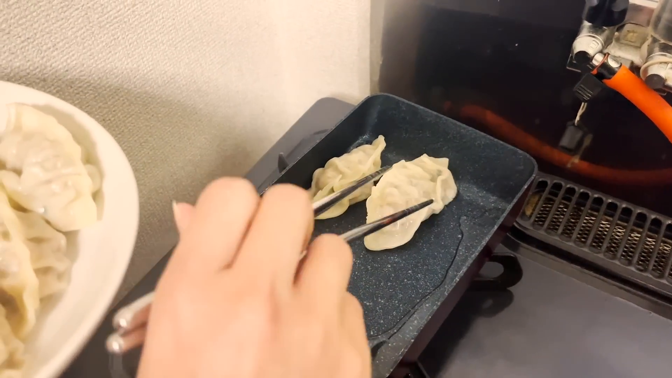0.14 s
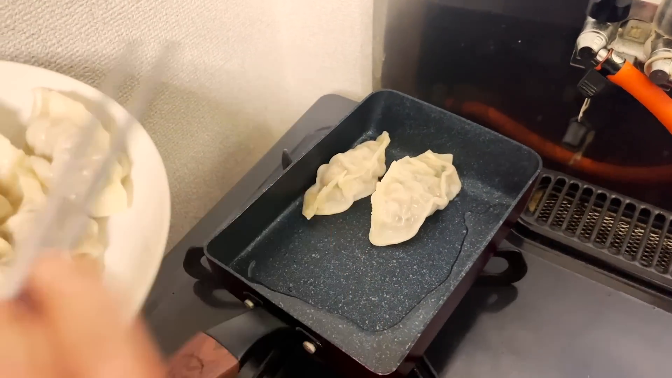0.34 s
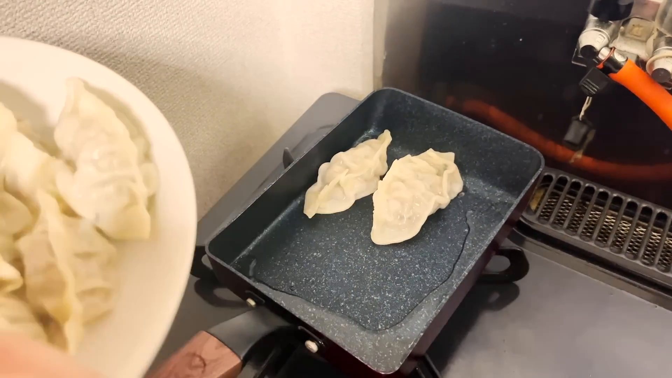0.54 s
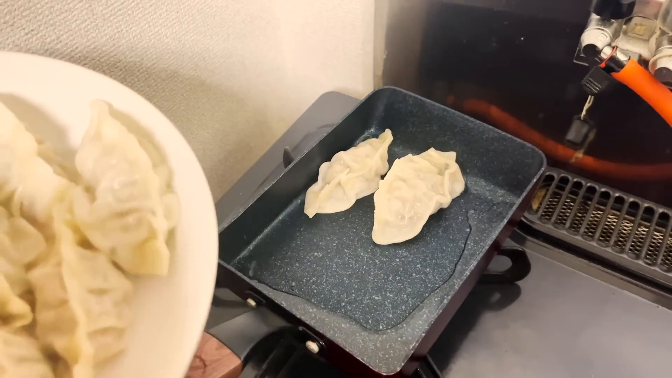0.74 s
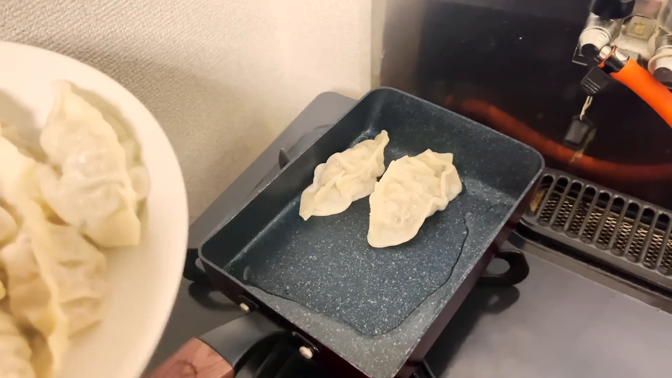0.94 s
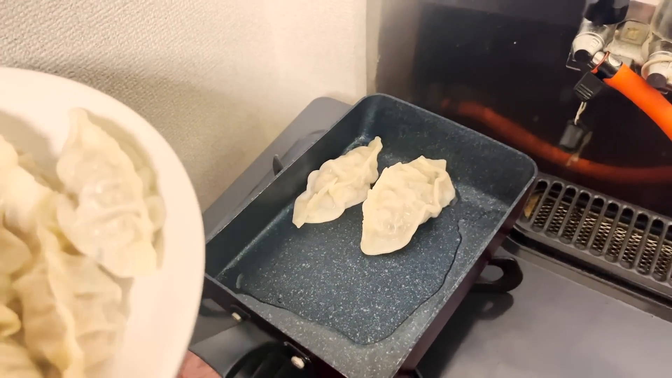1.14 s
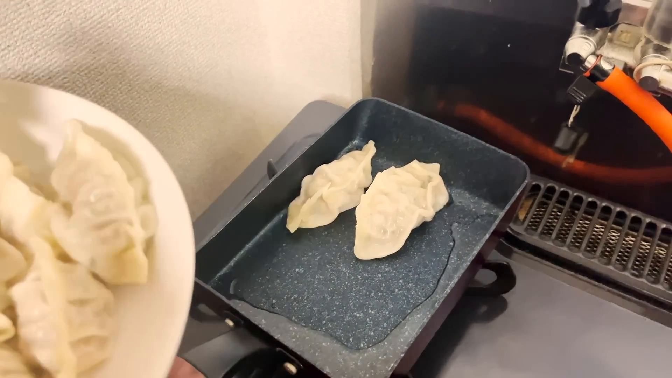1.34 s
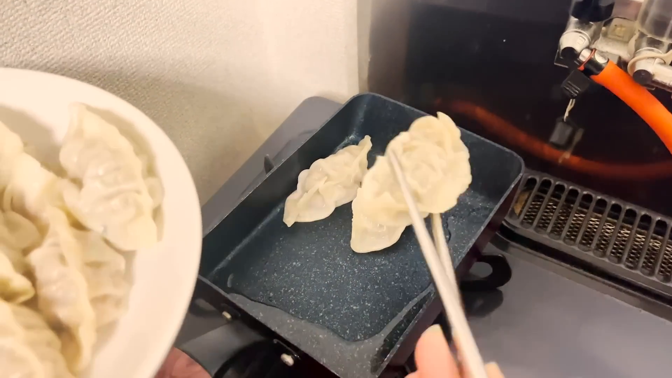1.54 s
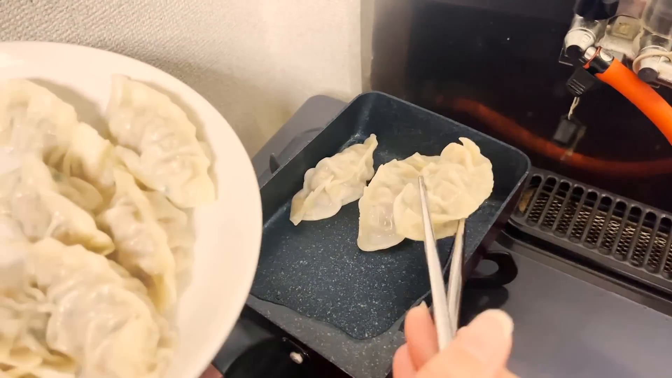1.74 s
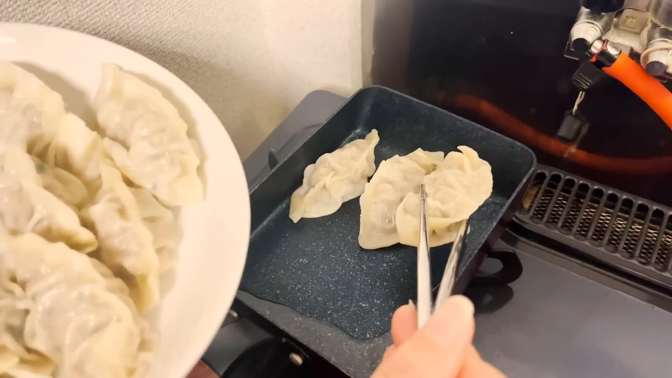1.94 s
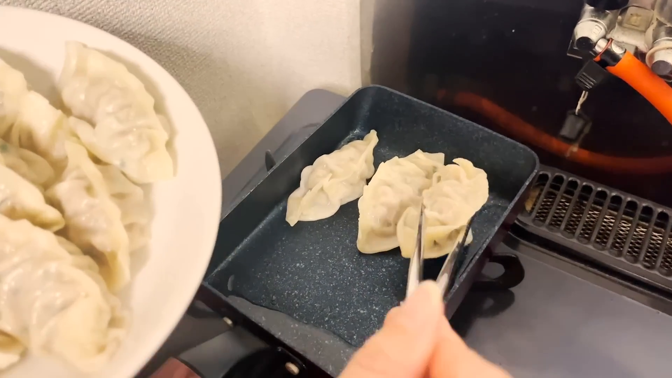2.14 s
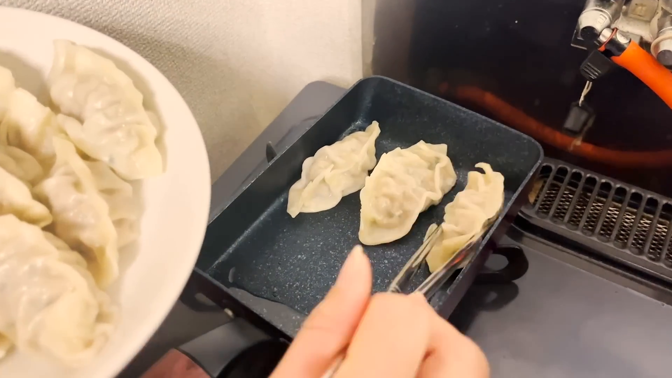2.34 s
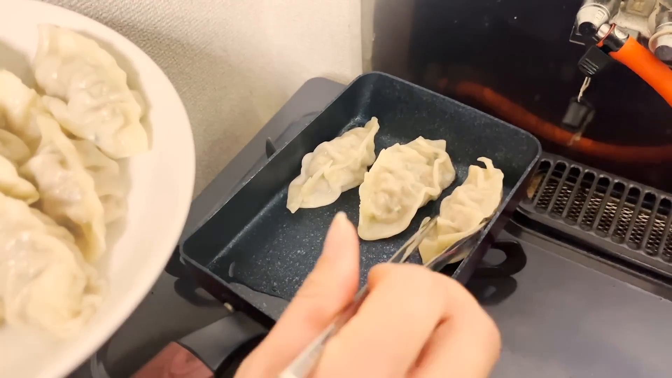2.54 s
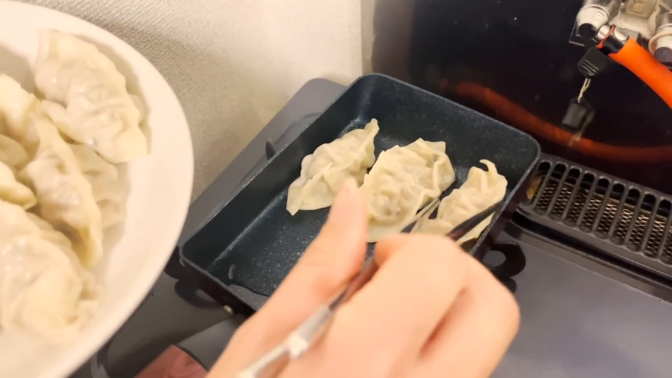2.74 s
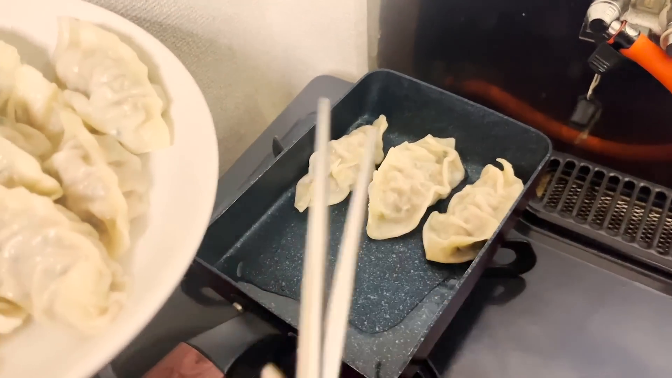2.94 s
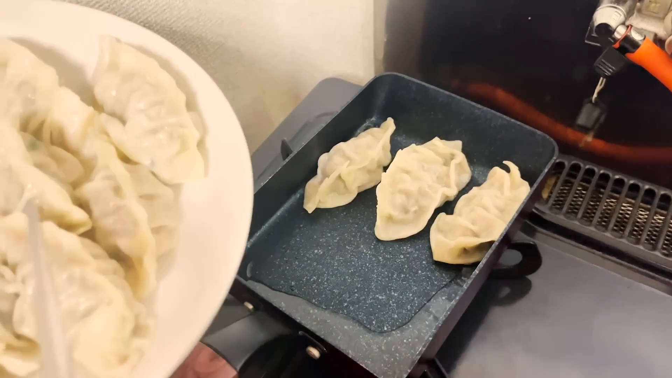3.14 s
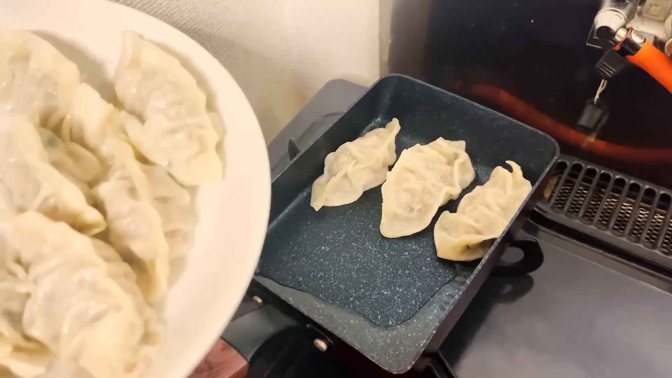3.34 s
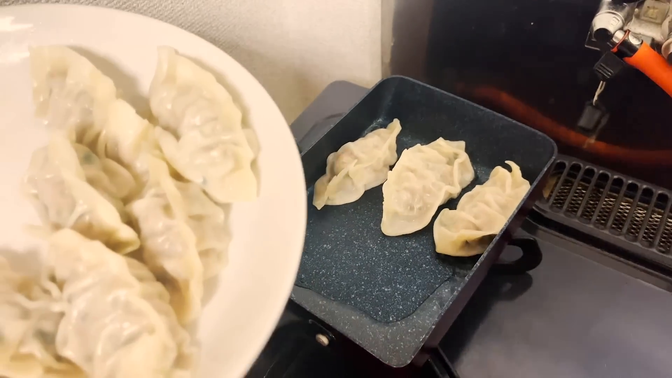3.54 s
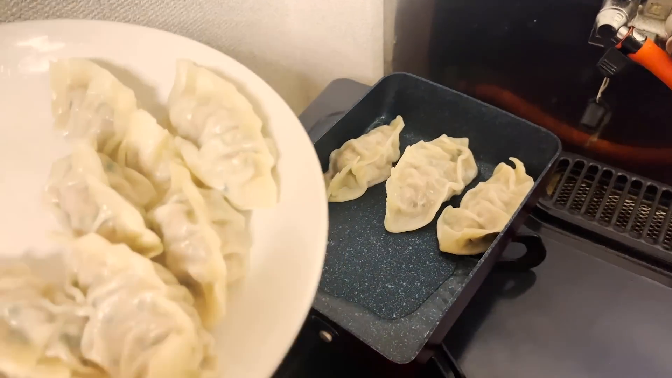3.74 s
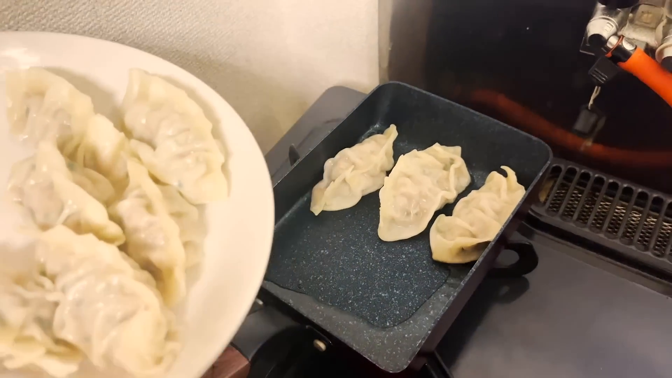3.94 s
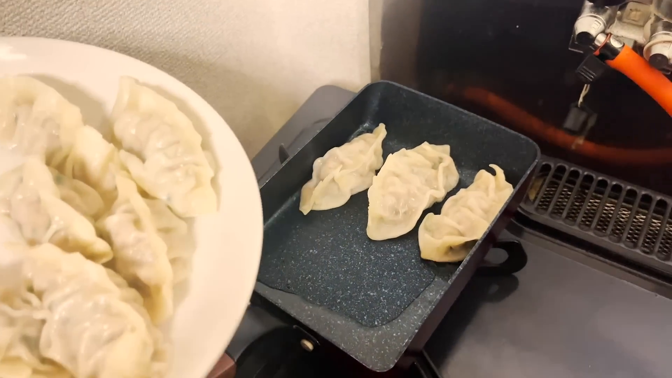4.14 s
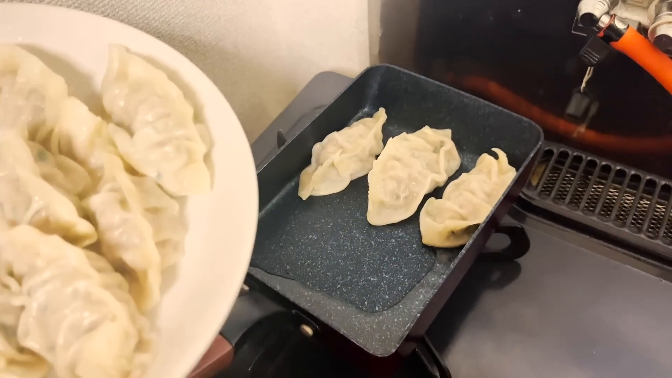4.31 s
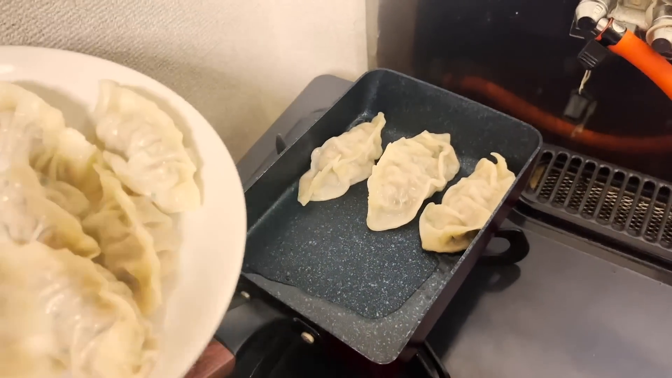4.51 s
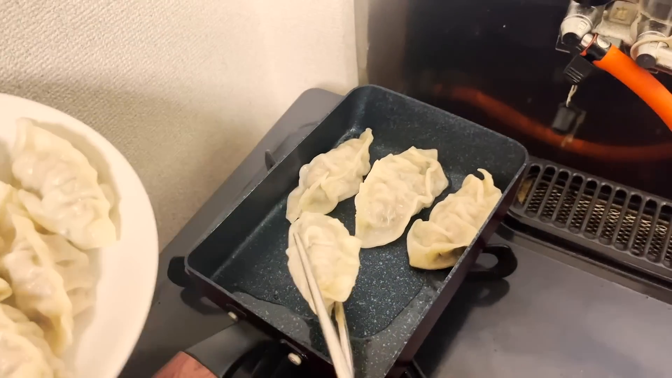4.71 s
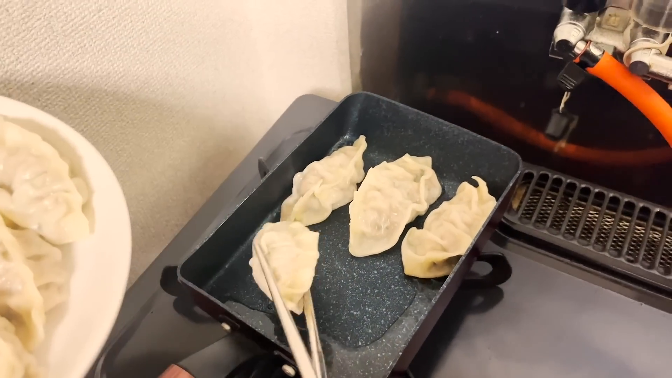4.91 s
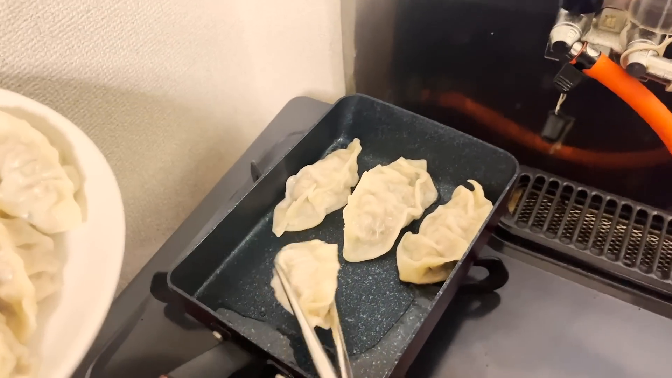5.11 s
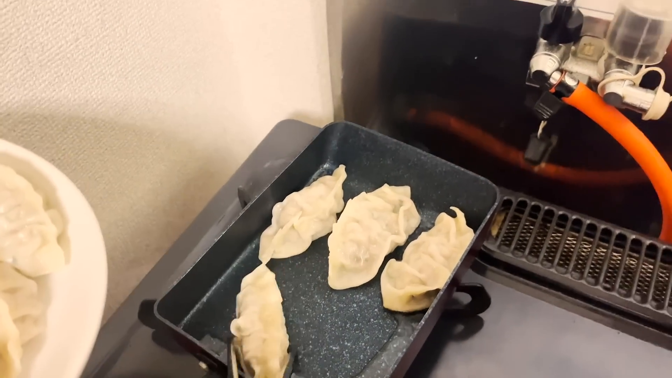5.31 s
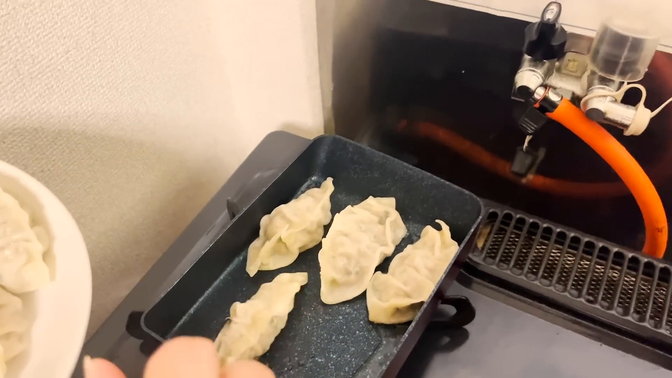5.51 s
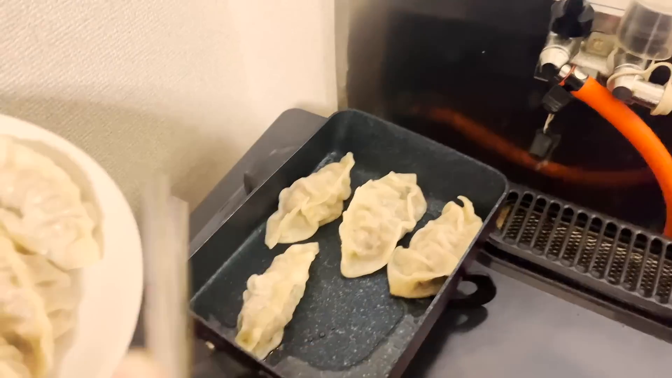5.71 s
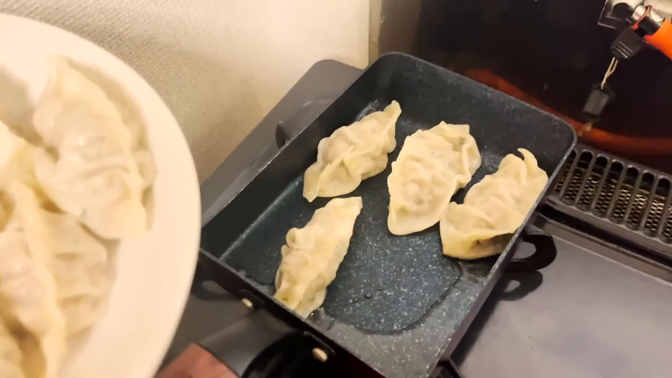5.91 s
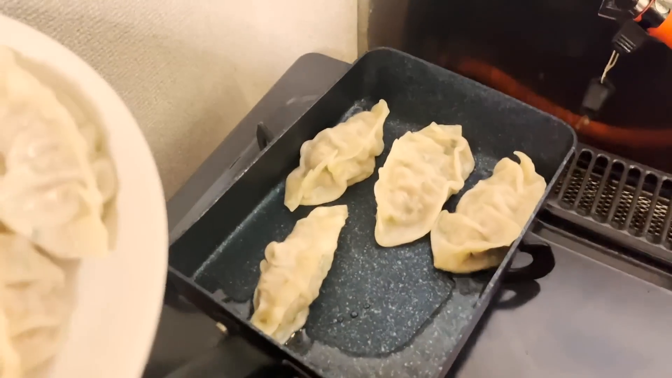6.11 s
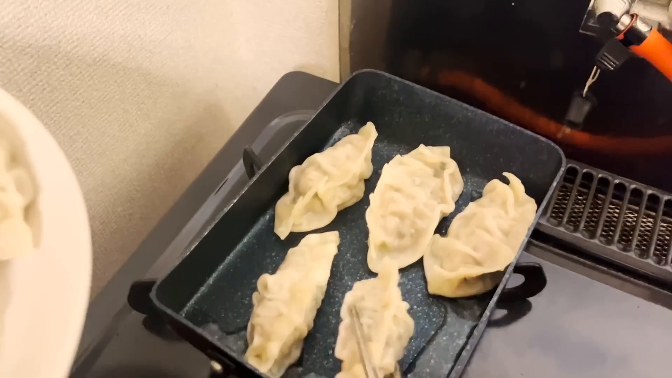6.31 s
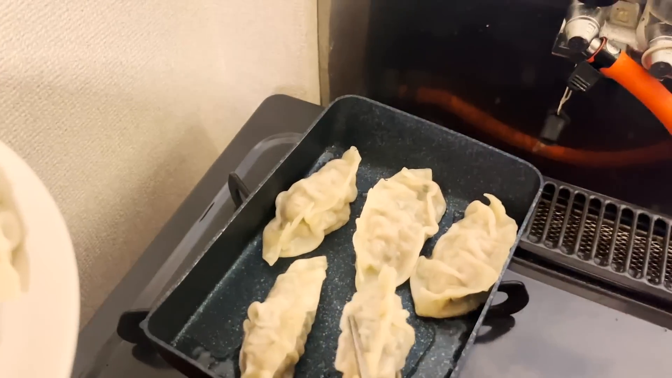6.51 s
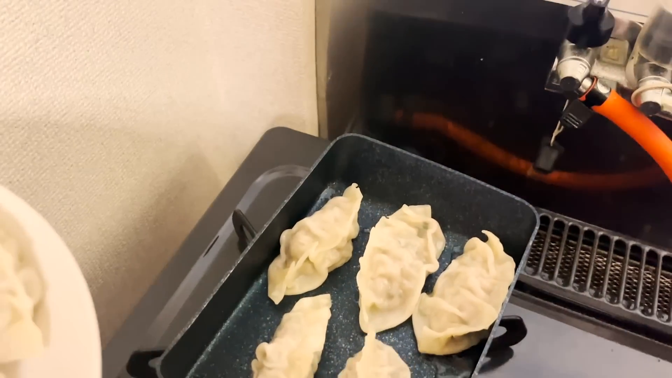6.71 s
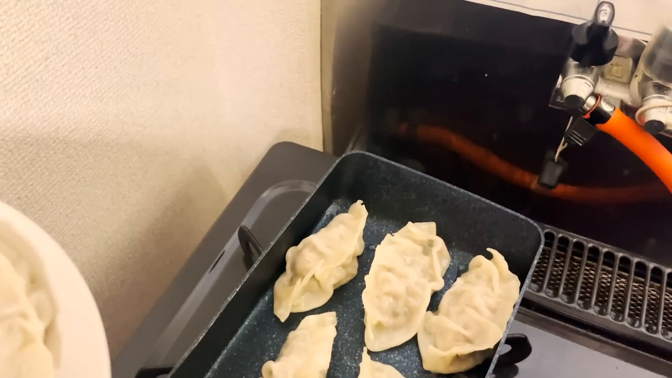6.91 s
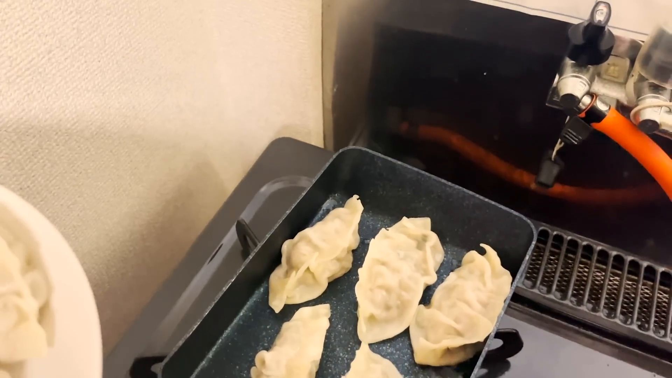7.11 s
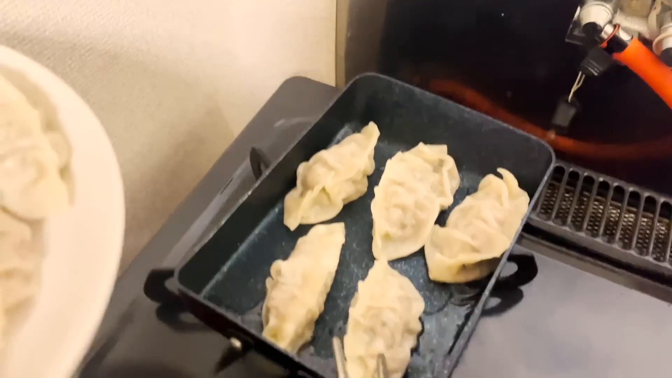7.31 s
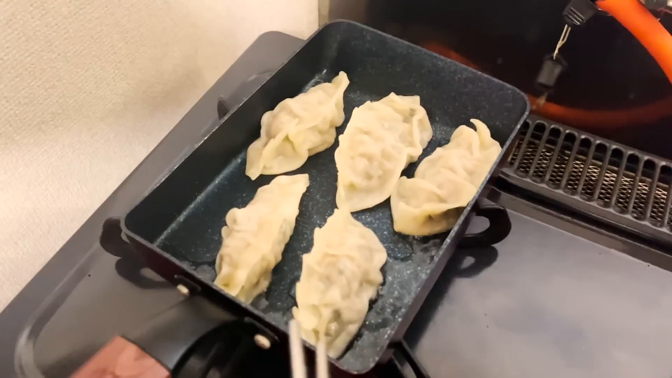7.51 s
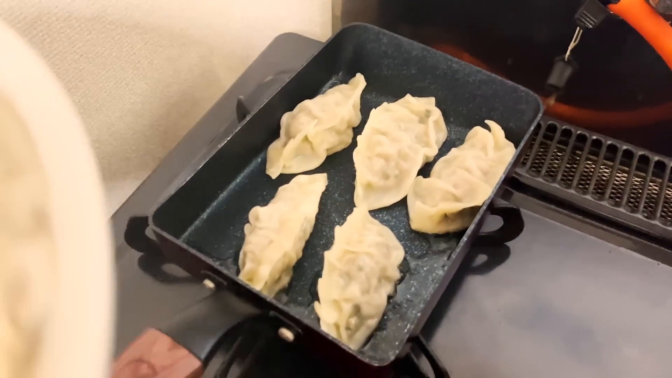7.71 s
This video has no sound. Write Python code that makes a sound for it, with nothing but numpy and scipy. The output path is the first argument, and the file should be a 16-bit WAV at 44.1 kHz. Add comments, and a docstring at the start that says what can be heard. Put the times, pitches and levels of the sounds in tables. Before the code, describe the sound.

Close crackling fry of dumplings in a home kitchen, dipping quieter midway then swelling again, with sharp oil pops, faint squeaks and a knock.

```python
"""Dumplings are set into a little hot oil in a small frying pan, in the corner of a home kitchen.
From the start random bubble bursts sizzle over a low rush of filtered noise, and drops spit in sharp cracks.
Metal chopsticks soon tick as decaying modes; low noise thuds at two landings, and a sinking drone comes and goes.
At a cut about 3 s in, a deep hum of narrow noise gives way to higher hums and the sizzle is quieter.
Then slipping chopsticks squeak as gliding tones, the sizzle swells again and a falling sine knocks once."""
import sys
import numpy as np
from scipy import signal
from scipy.fft import rfft, irfft, next_fast_len
from scipy.io import wavfile

SR = 44100
rng = np.random.default_rng(int(sys.argv[2]) if len(sys.argv) > 2 else 0)


def wrap_up_sound(samples):
    """Save the sound to the file named by the first command line argument, as 16-bit audio."""
    columns = np.atleast_2d(samples).T
    # keep every value between -1 and 1, then stretch to whole-number steps
    tamed = np.clip(columns, -1, 1)
    steps = np.round(tamed * 32767).astype(np.int16)
    wavfile.write(sys.argv[1], SR, steps)


N = 346273
TIME = np.arange(N) / SR
PRESSES_S, CUT_S, FILLS_S = 2.07, 3.11, 5.25   # centres of the changes in sizzle colour
ROOM_T60_S, CUTOFF_HZ = 0.17, 15900
# Signs of left and right.
SIDES = np.array([[1], [-1]])


def from_db(db):
    """Decibels to amplitude gain."""
    return 10 ** (np.asarray(db) / 20)


def rms_one(x):
    """Scale to an rms of 1."""
    return x / np.sqrt(np.mean(x ** 2) + 1e-20)


def at_hz(points, hz):
    """Interpolate a table over log frequency."""
    f, value = np.transpose(points)
    return np.interp(np.log(hz + 1), np.log(f), value)


def after(s, fade_s=0.042):
    """Linear rise from 0 to 1 centred on the given time."""
    return np.clip((TIME - s) / fade_s + .5, 0, 1)


def add(track, s, sound):
    """Mix a short sound into a track."""
    at = max(round(s * SR), 0)
    track[..., at:at + sound.shape[-1]] += sound[..., :N - at]


def drift(rate_hz, size=N):
    """Slow random curve from two-pole low-passed noise, scaled to an rms of 1."""
    r = np.exp(-40 * np.pi * rate_hz / SR)   # runs at SR / 20
    noise = rng.standard_normal(N // 20 + 4002)
    slow = signal.lfilter([1], [1, -2 * r, r * r], noise)[4000:]
    return np.interp(np.arange(size) / 20, np.arange(len(slow)), rms_one(slow))


def envelope(s, attack_s, hold_s, t60_s):
    """Linear attack, hold, then exponential release."""
    age = TIME - s
    release = np.clip(age - attack_s - hold_s, 0, 2 * t60_s)
    return np.clip(age / attack_s, 0, 1) * np.exp(-np.log(1000) * release / t60_s)


def colour(x, curve):
    """Causal (minimum-phase) filter whose gain in dB is curve(Hz)."""
    size = 8192
    cepstrum = irfft(np.log(from_db(curve(np.fft.rfftfreq(size, 1 / SR)))))
    cepstrum[1:size // 2] *= 2
    cepstrum[size // 2 + 1:] = 0
    response = irfft(np.exp(rfft(cepstrum)))
    response = response.reshape((1,) * (x.ndim - 1) + (-1,))
    return signal.fftconvolve(x, response, axes=-1)[..., :x.shape[-1]]


def cut(x, hz, kind, order=2):
    """Butterworth low- or high-pass."""
    return signal.sosfilt(signal.butter(order, min(hz, .45 * SR), kind, fs=SR, output="sos"), x)


def resonance(x, hz, width_hz):
    """One resonance with a gain of 1 at its peak."""
    r = np.exp(-np.pi * width_hz / SR)
    zeros = np.array([1, 0, -1]) * (1 - r * r) / 2
    return signal.lfilter(zeros, [1, -2 * r * np.cos(2 * np.pi * hz / SR), r * r], x)


def stereo_noise(size):
    """White noise, alike in both ears in the bass and largely unrelated in the treble."""
    # Each row: frequency in Hz, likeness of left and right from -1 to 1.
    likeness = [(70, .985), (140, .87), (300, .76), (1000, .5), (2500, .05), (5000, .05), (16000, .2)]
    mid, side = rfft(rng.standard_normal((2, size)))
    alike = np.clip(at_hz(likeness, np.fft.rfftfreq(size, 1 / SR)), -.99, .99)
    return irfft(np.sqrt((1 + alike) / 2) * mid + np.sqrt((1 - alike) / 2) * side * [[1], [-1]], size)


def path(tail_db=0.0, snap_db=-1.0, snap_t60_s=0.0045, pan_db=2.0, pan_t60_s=0.021,
         corner_db=-1.0, corner_t60_s=0.066, room_db=-7.5):
    """From pan to ears: direct snap, scatter in the pan, near walls, room; energy 1 per ear."""
    size = SR // 4
    t = np.arange(size) / SR
    out = np.zeros((2, size))
    scatter = ((pan_db, pan_t60_s), (corner_db + tail_db, corner_t60_s), (room_db + tail_db, ROOM_T60_S))
    for db, t60_s in scatter:
        decay = np.exp(-np.log(1000) * t / t60_s)
        out += from_db(db) * stereo_noise(size) * decay / np.linalg.norm(decay)
    # the tearing bubble film: an impulse and a short noise burst
    snap = rng.standard_normal(size) * np.exp(-np.log(1000) * t / snap_t60_s)
    snap *= from_db(snap_db) / np.linalg.norm(snap)
    snap[0] += 1
    lag = rng.integers(1, 3)   # samples by which the right ear is late
    out[0] += snap
    out[1, lag:] += snap[:-lag]
    return out / np.linalg.norm(out, axis=1, keepdims=True)


def frying():
    """Wet dough in hot oil: swells rise, then fade as the spot dries, over a simmer; body and fizz in dB."""
    # A dumpling is set down or shifted. Each row: start in seconds, rise in seconds, sizzle level in dB,
    # finest fizz level in dB, fade in dB per second; levels precede the trims in sizzle().
    swells = [(-1.0, 1.0, -27.6, -28.3, 8.0), (1.35, .3, -36.0, -39.5, 1.5),
              (2.32, .08, -31.0, -31.5, 14.0), (2.6, .23, -29.0, -33.0, 18.0),
              (3.07, .06, -38.5, -33.5, 5.5), (4.7, .08, -46.0, -41.0, 9.0), (5.17, .16, -32.4, -28.0, 7.5),
              (6.27, .08, -37.0, -35.5, 3.0), (6.55, .33, -28.8, -25.8, 7.4)]
    simmer_db, simmer_fizz_db = -45.2, -39.3
    power = from_db([[simmer_db], [simmer_fizz_db]]) ** 2
    for s, rise_s, body_db, fizz_db, fade_db_per_s in swells:
        fade = from_db(-fade_db_per_s * np.maximum(TIME - s - rise_s, 0))
        swell = np.clip((TIME - s) / rise_s, 0, 1) * fade
        if s + rise_s < CUT_S:   # early swells end at the cut to a quieter sizzle
            swell = swell * (1 - after(CUT_S))
        power = power + (from_db([[body_db], [fizz_db]]) * swell) ** 2
    return 10 * np.log10(power)


def bursts(per_s, spread_db, largest=3.5):
    """Bubbles burst at random, many small and few large; rms 1."""
    born = np.flatnonzero(rng.random(N) < per_s / SR)
    size_db = spread_db * np.minimum(rng.exponential(1, len(born)), largest)
    clicks = np.zeros(N)
    clicks[born] = from_db(size_db) * rng.choice([-1, 1], len(born))
    return rms_one(clicks)


def sizzle(fine_per_s=540, coarse_per_s=44, coarse_db=-3.8, ring_per_s=40, ring_db=-6.0, ring_width=0.15,
           sputter_db=2.8, surge_db=0.4, thinning_octaves=1.3, sizzle_db=-0.5, fizz_db=0.8, count=8):
    """Wet spots sputter independently; the harder the pan fries, the more bubbles burst."""
    # Sizzle colour in four stages. Each row: frequency in Hz, relative level in dB.
    spectrum_first = [(250, -31), (500, -19.5), (800, -19), (1020, -13.5), (1500, -12), (1950, -7.5),
                      (2600, -6), (3400, -4.5), (4700, -4), (7400, 2), (10000, -0.5), (12500, -0.5),
                      (15500, 1)]
    spectrum_pressed = [(250, -31), (550, -17.5), (800, -19), (1020, -14), (1500, -14), (2400, -7.5),
                        (3300, -5), (4500, -2.5), (7000, 0.5), (9000, -0.5), (10500, -2), (13000, -4),
                        (15500, -2.5)]
    spectrum_quiet = [(250, -37), (500, -9.5), (800, -11.5), (1000, -11.5), (1250, -14), (1700, -12),
                      (2500, -10), (3300, -6), (4500, -3), (6000, -4), (7800, -2), (10000, -2),
                      (12500, 0.5), (15500, -3)]
    spectrum_full = [(250, -36), (500, -14), (800, -15), (1000, -15), (1250, -15), (1700, -11.5),
                     (2400, -12), (3300, -4.5), (4500, -3.5), (6000, -2.5), (7800, 0), (10000, 0),
                     (13200, 5), (15500, 1.5)]
    level_db, top_db = frying()
    vigour = from_db(level_db - np.mean(level_db))
    pitches_hz = np.geomspace(3600, 14500, 3 * count)
    out = np.zeros((2, N))
    for k, lean in enumerate(np.linspace(-1, 1, count)):
        # brighter spots have fewer, more separate fine bursts
        fine_rate = fine_per_s * vigour * 2 ** (-thinning_octaves * lean)
        fine = bursts(fine_rate, spread_db=5.35) * from_db(sputter_db * drift(60))
        coarse = bursts(coarse_per_s * vigour, spread_db=3.5, largest=2.8)
        # some bubbles ring for a few cycles, at three pitches per spot
        rings = sum(resonance(bursts(ring_per_s * vigour, spread_db=6.5, largest=3.08), hz, ring_width * hz)
                    for hz in pitches_hz[k::count])
        clicks = rms_one(fine) + from_db(coarse_db) * coarse + from_db(ring_db) * rms_one(rings)
        clicks = clicks / np.sqrt(vigour)
        # spots with smaller bubbles sound brighter
        response = colour(path(tail_db=-2.5, pan_db=1.0),
                          lambda hz: 3.2 * lean * np.log2(np.clip(hz, 2000, None) / 7000))
        out += signal.oaconvolve(clicks[None], response, axes=1)[:, :N]
    out *= from_db(surge_db * drift(32))
    pressed, quiet, full = after(PRESSES_S, fade_s=.3), after(CUT_S), after(FILLS_S)
    stages = ((1 - pressed, spectrum_first), (pressed - quiet, spectrum_pressed),
              (quiet - full, spectrum_quiet), (full, spectrum_full))
    fried = 0
    for share, spectrum in stages:
        stage = colour(out, lambda hz: at_hz(spectrum, hz))
        body = rms_one(cut(stage, 9500, "low", order=5))
        fizz = rms_one(cut(stage, 9500, "high", order=5))
        fried = fried + share * (from_db(level_db + sizzle_db) * body + from_db(top_db + fizz_db) * fizz)
    return fried


def shifting(x, count=12):
    """The prevailing bubble sizes keep changing, so narrow bands of the sizzle come and go."""
    shift_db, rate_hz, width = 2.0, 11, .07   # width as a share of the centre
    out = x
    for hz in np.geomspace(2600, 13000, count):
        lift = from_db(shift_db * (drift(rate_hz) - .2)) - 1
        out = out + lift * resonance(out, hz, width * hz)
    return out


def hollows(x, waver_db=1.0, wander=0.006):
    """Air pockets by the dumplings sing in narrow bands, wandering in pitch and strength as the oil moves; the
    low band near 650 Hz rings as a dumpling lands."""
    # Each row: start in seconds, end in seconds, centre in Hz, width in Hz, mean lift in dB.
    pockets = [(-0.1, 0.5, 2975, 32, 14), (0.5, 1.2, 2975, 40, 6.5), (-0.1, 0.45, 2380, 40, 7),
               (1.55, 2.0, 650, 90, 9), (2.1, 2.4, 6020, 50, 11), (2.4, 3.05, 6020, 120, 4),
               (2.0, 3.7, 11500, 700, 3), (5.25, 5.7, 4950, 100, 7), (5.25, 7.6, 3100, 120, 2.5),
               (6.0, 8.0, 1500, 90, 2.5), (6.7, 7.3, 3980, 150, 5), (7.1, 8.0, 8300, 450, 4.5)]
    out = x.copy()
    for start, end, hz, width_hz, db in pockets:
        share = after(start, 0.046) - after(end, 0.2)
        span = slice(*np.flatnonzero(share > 0)[[0, -1]])
        size = span.stop - span.start
        # shift the band to 0 Hz, low-pass, shift back
        turn = np.exp(2j * np.pi * np.cumsum(hz * (1 + wander * drift(5, size=size))) / SR)
        r = np.exp(-np.pi * width_hz / SR)
        sung = 2 * np.real(turn * signal.lfilter([1 - r], [1, -r], out[:, span] / turn))
        lift_db = share[span] * (db + waver_db * drift(4, size=size))
        out[:, span] += (from_db(lift_db) - 1) * sung
    return out


def flurries():
    """Gain of the frying as it flares up and falters, each a smooth bump in dB."""
    # Each row: middle in seconds, half length in seconds, peak change in dB.
    bumps = [(0.215, .06, 3), (0.35, .05, 2), (0.59, .04, 3.5), (0.655, .06, -6), (0.71, .06, 4.5),
             (1.08, .03, 3), (1.195, .05, -3.5), (1.725, .04, 3), (2.03, .03, 3), (2.29, .06, -2.5),
             (2.39, .06, 2), (3.07, .06, 4.5), (3.19, .06, -3), (3.275, .04, -5), (3.555, .03, 3),
             (3.6, .03, 3.5), (3.85, .03, 3.5), (3.895, .04, -3), (4.23, .05, -6), (4.34, .06, 4.5),
             (4.77, .04, 3), (4.87, .08, 4.5), (5.172, .03, -5), (5.856, .02, 3), (5.92, .06, -3),
             (6.4, .08, 2.5), (6.632, .025, 4.5), (6.685, .04, 2.5), (7.025, .03, 3), (7.29, .04, 2.5)]
    db = np.zeros(N)
    for s, length_s, size_db in bumps:
        add(db, s - length_s, size_db * np.hanning(int(2 * length_s * SR)))
    return from_db(db)


def kitchen(deep_hum_db=-62.5, hum_db=-56.2, upper_hum_db=-66.0, overtone_db=-12.0):
    """Stove and kitchen: a low noise rush and hums of narrow noise; from outside, a sinking drone passes."""
    # Rush before and after the cut at 3.11 s. Each row: frequency in Hz, relative level in dB.
    rush_first = [(15, -32), (25, -48.5), (75, -3), (91, -3.5), (114, -11), (163, -3), (230, -18),
                  (271, -10), (345, -18.5), (600, -15.5), (719, -27), (900, -19.5), (1170, -50),
                  (1980, -120)]
    rush_later = [(15, -95), (25, -56), (54, -34), (91, -6.5), (104, -11.5), (119, -1), (189, -4.5),
                  (259, -2.5), (350, -10.5), (438, -9), (517, -20), (900, -22.5), (1170, -38), (1980, -120)]
    rush_first_db, rush_later_db, wander_db = -50.3, -49.7, .6
    dip_s, dip_width_s, dip_db = 6.21, .12, -7.5
    peak_s, peak_db, rise_db_per_s, fall_db_per_s = 2.45, -40.8, 16.0, 27.0   # drone
    peak_hz, sag_hz_per_s = 91.5, 23.0
    later = after(CUT_S)
    dip = dip_db * np.exp(-((TIME - dip_s) / dip_width_s) ** 2)
    level = from_db(wander_db * drift(3) + dip)
    air = stereo_noise(next_fast_len(N))[:, :N]
    rush = (1 - later) * from_db(rush_first_db) * rms_one(colour(air, lambda hz: at_hz(rush_first, hz)))
    rush += later * from_db(rush_later_db) * rms_one(colour(air, lambda hz: at_hz(rush_later, hz)))

    def hum(hz, width_hz):
        """Noise through two equal resonances."""
        return rms_one(resonance(resonance(rng.standard_normal(N), hz, width_hz), hz, width_hz))

    hums = (1 - later) * from_db(deep_hum_db) * hum(71.7, 18)
    hums = hums + later * (from_db(hum_db) * hum(124.7, 6) + from_db(upper_hum_db) * hum(269.7, 10.3))
    past_peak_s = TIME - peak_s
    drone_hz = peak_hz - sag_hz_per_s * past_peak_s
    drone_db = peak_db + np.minimum(rise_db_per_s * past_peak_s, -fall_db_per_s * past_peak_s)
    phase = 2 * np.pi * np.cumsum(drone_hz * (1 + 0.0046 * drift(7))) / SR
    tone = np.sin(phase) + from_db(overtone_db) * np.sin(2 * phase)
    drone = from_db(drone_db + 1.2 * drift(6.1)) * tone * np.sqrt(2)
    return level * (rush + hums) + drone * (1 - later)


def drops(count=100):
    """Lesser spits at random moments, louder when the pan fries harder; rows as in spits()."""
    mean_db, spread_db, follow = -9.5, 2.0, .8   # follow: share of the sizzle's swing in dB
    centre_hz, range_octaves, width_octaves = 9800, .7, .55
    level_db = frying()[0]
    when, size, pitch, spread = rng.uniform(-1, 1, (count, 4)).T
    s = (1 + when) / 2 * TIME[-1]
    db = mean_db + spread_db * size + follow * np.interp(s, TIME, level_db - np.mean(level_db))
    return list(zip(s, db, centre_hz * 2 ** (range_octaves * pitch), width_octaves * 2 ** (spread / 2)))


def spits(level_db=-0.1, skirt_db=20.0, spray_db=-10.5, spray_s=.005, count=6):
    """A drop bursts in one sharp crack amid a mostly later spray of tiny ones, each drop with its own colour."""
    # Loudest drops. Each row: time in seconds, relative energy in dB, centre in Hz, spread in octaves.
    loud_drops = [(0.2043, 4.5, 7200, .6), (0.3648, -1, 7040, .55), (0.3955, -3, 9500, .7),
                  (0.4264, 1.5, 8000, .7), (0.5027, -2, 6000, .7), (0.5766, 1, 6000, .85),
                  (0.6011, -4, 5900, .8), (0.6782, 0, 7600, .6), (0.6838, -1, 8000, .9),
                  (0.718, -1.5, 6500, .35), (0.9293, 2, 7600, .8), (0.9883, -7.5, 2500, .35),
                  (1.1234, -5, 6300, .5), (1.2698, -1.5, 9800, .55), (1.294, 2, 7400, 1.15),
                  (1.317, -8, 10000, .7), (1.4941, -6, 8500, .8), (1.6085, -7, 4100, .9),
                  (1.7032, -3.5, 5400, 1.15), (1.7315, -3, 5600, 1.25), (1.7701, -4, 6400, .8),
                  (1.8474, -7, 4400, .6), (1.8647, -4, 6800, .9), (2.028, -5, 7200, .5),
                  (2.1203, -4, 6500, .7), (2.2679, -6, 7600, .9), (2.8555, 2, 7160, .4),
                  (2.8919, 1.5, 8240, .4), (3.051, 3.5, 5100, .75), (3.0763, 4, 6500, .6),
                  (3.236, -2.5, 8900, .4), (3.4437, -7, 4900, .8), (3.7107, -5.5, 5200, .9),
                  (3.7428, -5, 5300, .9), (3.8144, -8.5, 4300, .8), (3.8485, -4, 10000, .7),
                  (3.9385, -7.5, 8000, .5), (3.9607, 2, 6000, .9), (4.0227, -5.5, 10400, .6),
                  (4.247, -3, 10000, .65), (4.3301, 3.5, 6600, 1.2), (4.3624, -4, 8500, .95),
                  (4.3941, -5, 10100, .7), (4.4329, -2, 9500, .9), (4.6994, -5.5, 9300, .9),
                  (4.7285, -7, 11500, .5), (4.7695, -6.5, 6700, .8), (4.8409, -5.5, 8500, 1.4),
                  (4.9249, -8, 8000, .9), (4.9979, -2, 10100, .8), (5.0251, -9.5, 5900, .9),
                  (5.0703, -9, 7700, .7), (5.1108, -7.5, 7500, .7), (5.136, -6, 12000, .9),
                  (5.256, -12, 3700, .4), (5.3857, 0, 11000, .9), (5.4695, -1, 10000, .8),
                  (5.4905, -2, 8500, 1.0), (5.6908, -5, 5900, .8), (5.8475, 2.5, 11000, .75),
                  (6.017, -1, 7160, 1.1), (6.101, -5.5, 7000, .9), (6.1164, -4, 8700, .8),
                  (6.1785, -6.5, 5200, .7), (6.246, -5, 10500, .6), (6.272, -2, 11500, .6),
                  (6.36, -1, 9500, .9), (6.4049, -4, 6200, 1.0), (6.5964, 1, 13000, .8),
                  (6.632, -.5, 8500, .8), (6.7727, 4.5, 13500, .5), (6.844, 1, 6000, .8),
                  (6.973, 1.5, 5500, .7), (7.213, 4, 8500, .35), (7.2854, 3, 11800, .45),
                  (7.3472, 1.5, 7200, .8), (7.4948, 0, 8540, .35), (7.5302, -4, 5200, .8),
                  (7.5529, -1, 8700, .5), (7.5965, 5.3, 9400, .4), (7.7206, -3, 8100, .8),
                  (7.8226, -3, 7800, .9)]
    out = np.zeros((2, N))
    lead = SR // 50   # samples before the main crack
    for s, db, centre_hz, octaves in loud_drops + drops():
        at = np.clip(lead + rng.normal(.9, 1, count) * spray_s * SR, 0, 3 * lead - 1).astype(int)
        spray = np.bincount(at, rng.standard_normal(count), 3 * lead)
        clicks = from_db(spray_db) * spray / np.linalg.norm(spray)
        clicks[lead] += 1
        crack = signal.fftconvolve(clicks[None], path(tail_db=-1.5, snap_db=2.0, pan_db=0.5), axes=1)
        crack = colour(crack, lambda hz: -np.minimum(
            2.54 * (np.log2((hz + 1) / centre_hz) / octaves) ** 2, skirt_db))
        crack = cut(cut(crack, 680, "high"), CUTOFF_HZ, "low", order=6)
        add(out, s - lead / SR, crack * from_db(db + level_db) / np.sqrt(np.sum(crack ** 2) / 2))
    return out


def pan_body(x):
    """The sizzle and spits take on the resonances of the pan and its corner."""
    # Before and after the cut at 3.11 s. Each row: centre in Hz, width in Hz, lift or dip in dB.
    bands_first = [(1040, 70, 4.5), (1150, 90, -8), (1260, 60, 5.5), (1620, 70, 3), (1740, 90, -4),
                   (1870, 70, 3), (2130, 110, 2.5), (2370, 90, 2.5), (3450, 130, 2.5), (3690, 150, -3.5),
                   (4020, 110, 2)]
    bands_later = [(1280, 200, -4), (1510, 110, 6), (1750, 100, 5.5), (1880, 120, -7), (2130, 250, 4),
                   (2710, 80, 3), (2810, 80, -3), (3100, 170, 4), (3700, 150, -4.5), (3980, 250, 4),
                   (4370, 250, -3.5), (4880, 200, 4)]

    def shaped(bands):
        """Sum the bands in dB and filter."""
        return colour(x, lambda f: sum(db / (1 + (2 * (f - hz) / width_hz) ** 2) for hz, width_hz, db in bands))

    first, later = shaped(bands_first), shaped(bands_later)
    return first + after(CUT_S) * (later - first)


def chopsticks():
    """Ticks ring thin rods; a slipping tip squeaks, from nearly pure to strong in its second harmonic."""
    # Each row: mode frequency in Hz, T60 in seconds.
    modes = [(6560, .02), (11350, .02), (15300, .016)]
    # Each row: time in seconds, relative energy of the low, middle and high mode in dB.
    ticks = [(1.0505, -1.5, -9, -26), (2.120, -10.5, -24, -18), (3.291, -14, -37, -15),
             (3.3977, -18, 4.5, 3), (3.4015, -30, -1, -23), (3.548, -5, -17, -24), (3.591, -8, -8, 1)]
    # Each row: time in seconds, length in seconds, start in Hz, end in Hz, level in dB,
    # second harmonic relative to the first in dB.
    squeaks = [(4.051, 0.028, 6690, 6640, -28.5, -30), (4.099, 0.028, 6650, 6760, -28.5, -21.5),
               (7.180, 0.033, 660, 790, -35.5, -3), (7.208, .013, 890, 1000, -37, -17),
               (7.22, .018, 930, 860, -54, -24)]
    out = np.zeros((2, N))
    t = np.arange(SR // 10) / SR
    for s, *levels_db in ticks:
        for (hz, t60_s), db in zip(modes, levels_db):
            ring = np.sin(2 * np.pi * hz * t) * np.exp(-np.log(1000) * t / t60_s)
            ring[0] += 2.2   # hard contact click
            ring = cut(ring, 5500, "high", order=6)
            response = path(snap_db=-12.0, pan_db=-6.0, corner_db=-14.0, room_db=-16.0)
            heard = signal.fftconvolve(ring[None], response, axes=1)
            add(out, s, from_db(db) * heard / np.linalg.norm(heard, axis=1, keepdims=True))
    for s, length_s, start_hz, end_hz, db, second_db in squeaks:
        u = np.linspace(0, 1, int(length_s * SR))
        waver = drift(120)[:len(u)]
        glide_hz = start_hz + (end_hz - start_hz) * u ** 3
        phase = 2 * np.pi * np.cumsum(glide_hz * (1 + 0.002 * waver)) / SR
        tone = np.sin(phase) + from_db(second_db) * (1 - u ** 6) * np.sin(2 * phase)
        tone = tone * signal.windows.tukey(len(u), .5) * from_db(1.0 * waver)
        add(out, s, from_db(db) * rms_one(tone))
    return out


def landings():
    """Soft dough comes down on the pan with a low rumble of resonant noise."""
    # Each row: start in seconds, level in dB.
    thuds = [(1.71, -44.5), (5.24, -51.0)]
    attack_s, t60_s, centre_hz, width_hz = .04, 1.2, 115, 60
    rumble = rms_one(cut(resonance(rng.standard_normal(N), centre_hz, width_hz), 70, "high"))
    return rumble * sum(from_db(db) * envelope(s, attack_s, 0, t60_s) for s, db in thuds)


def knock(rest_hz=148, sweep_cycles=1.15, onset_s=.00012, settle_s=.007, left_lead_rad=.72, left_db=.4):
    """A bending wave in thin metal: highs arrive first, then the pitch drops to a thud and faint ring."""
    start_s, attack_s = 5.9672, .001
    thump_db, thump_hold_s, thump_t60_s = -16.6, .0066, .016
    ring_db, ring_hold_s, ring_t60_s = -36.2, .052, .08
    age = np.maximum(TIME - start_s, 0)
    sweep_hz = (age > 0) * sweep_cycles / (age + onset_s) * np.exp(-age / settle_s)
    cycles = rest_hz * age + np.cumsum(sweep_hz) / SR
    thump = from_db(thump_db) * envelope(start_s, attack_s, thump_hold_s, thump_t60_s)
    ring = from_db(ring_db) * envelope(start_s, attack_s, ring_hold_s, ring_t60_s)
    wave = np.sin(2 * np.pi * cycles + left_lead_rad / 2 * SIDES)
    wave = np.maximum(thump, ring) * wave * from_db(left_db * SIDES)
    # the flexing sheet gives the air one soft push
    push_db, push_s = -45.0, .002
    return wave - from_db(push_db) * age / push_s * np.exp(1 - np.minimum(age / push_s, 100))


def scene(left_first_db=0.6, left_full_db=1.0, kitchen_width=0.6):
    """The pan lies a little left, more so once its near side fills; the kitchen is narrowed to the middle."""
    lean_db = left_first_db + (left_full_db - left_first_db) * after(FILLS_S)
    fried = hollows(shifting(sizzle())) * flurries()
    pan = pan_body(fried + spits()) + chopsticks() + knock() + landings()
    low = kitchen()
    return pan * from_db(lean_db * SIDES) + kitchen_width * low + (1 - kitchen_width) * low.mean(axis=0)


def record(dry):
    """Steep elliptic low-pass."""
    return signal.sosfilt(signal.ellip(12, .1, 70, CUTOFF_HZ, fs=SR, output="sos"), dry)


dry = scene()
out = record(dry)
wrap_up_sound(out)
```